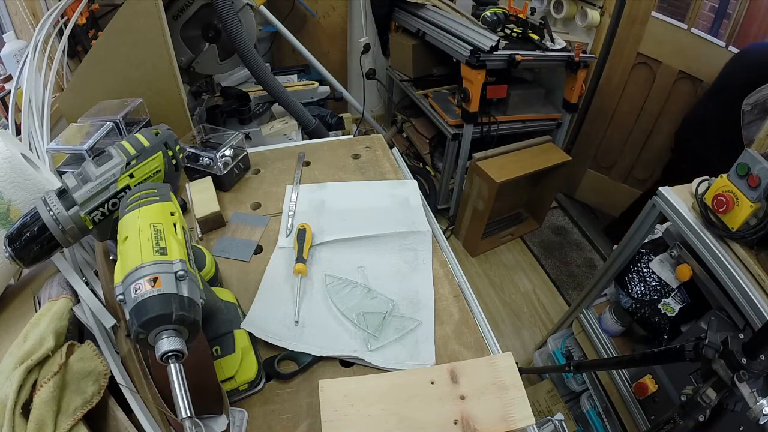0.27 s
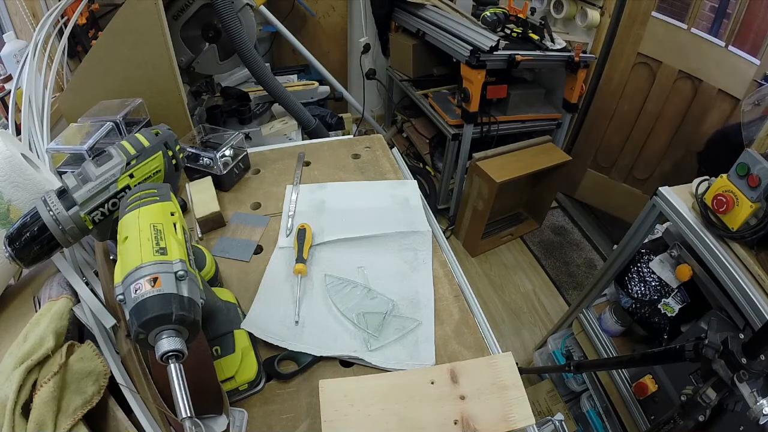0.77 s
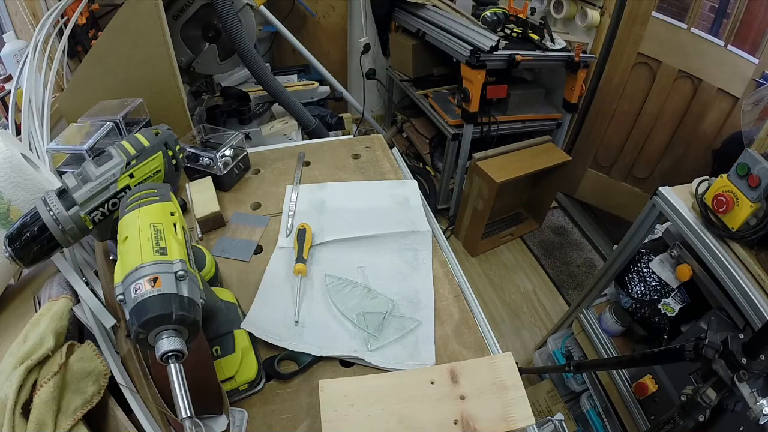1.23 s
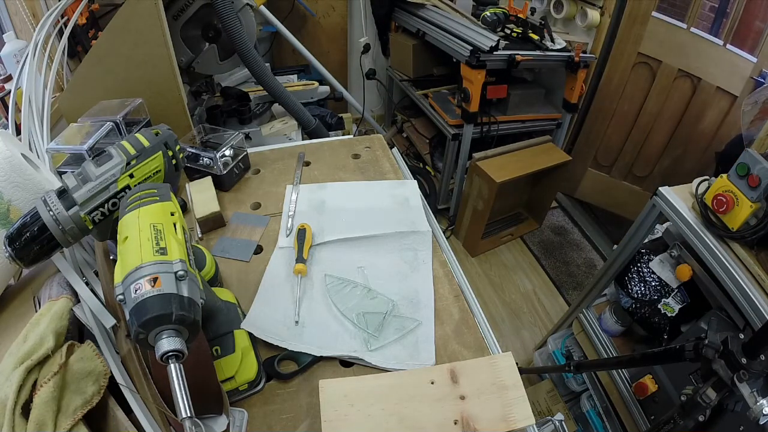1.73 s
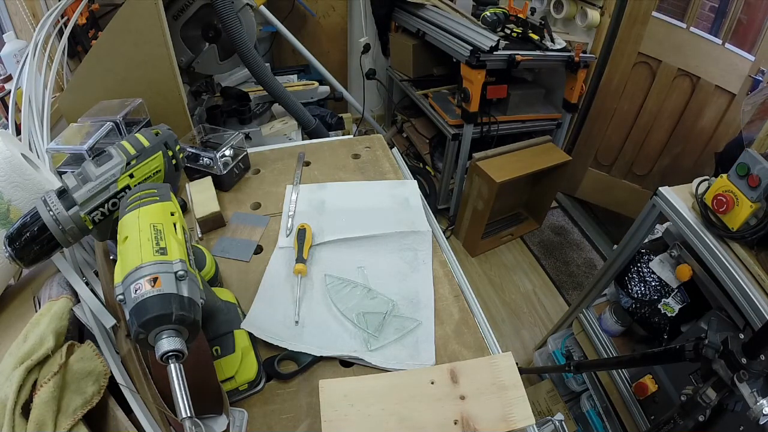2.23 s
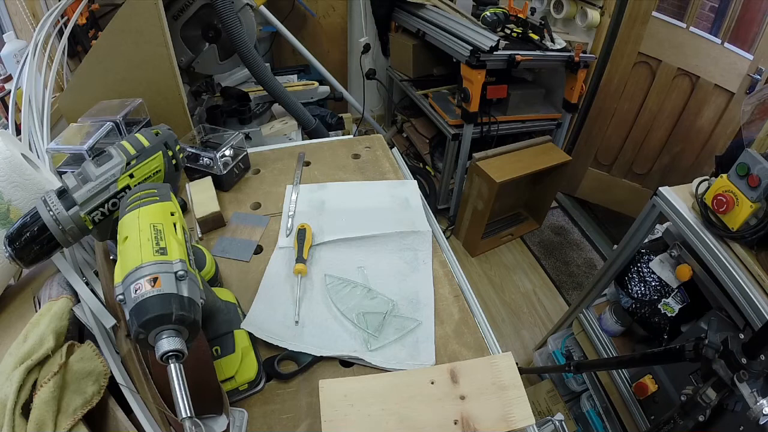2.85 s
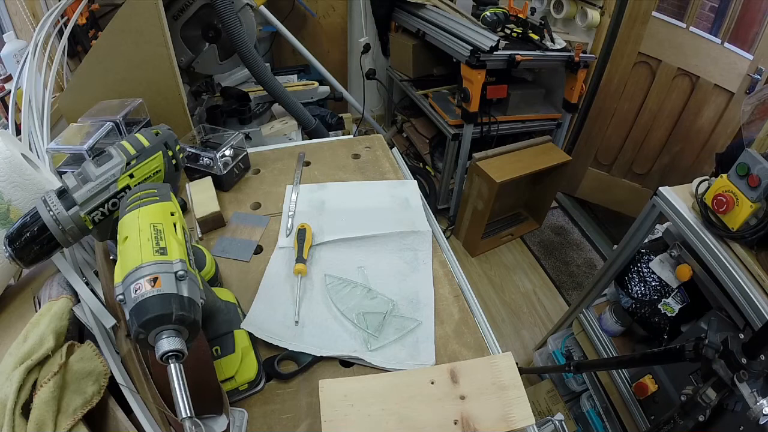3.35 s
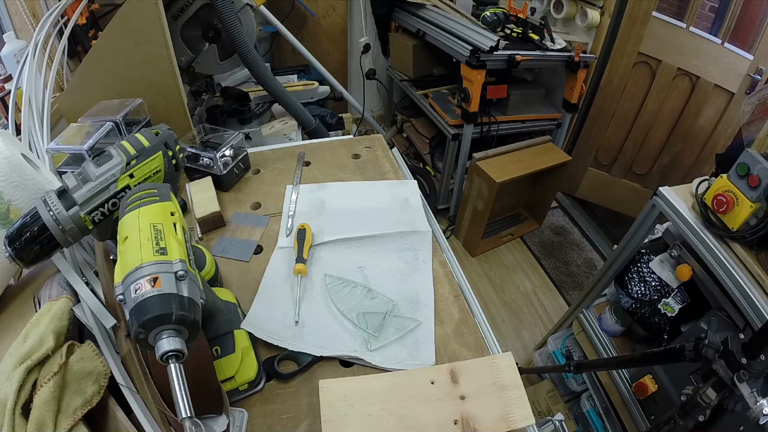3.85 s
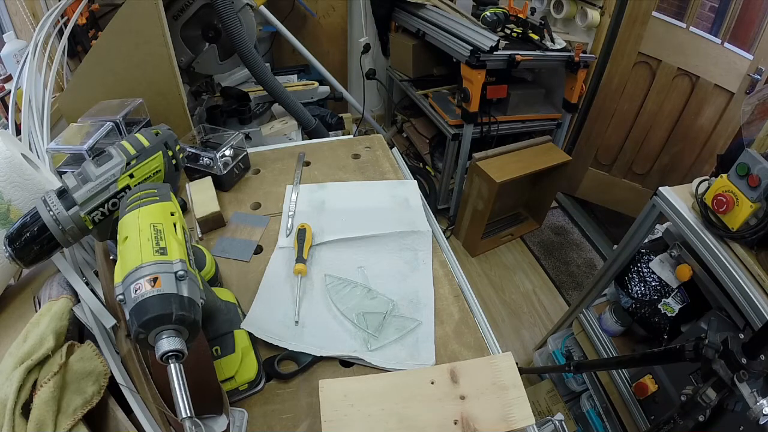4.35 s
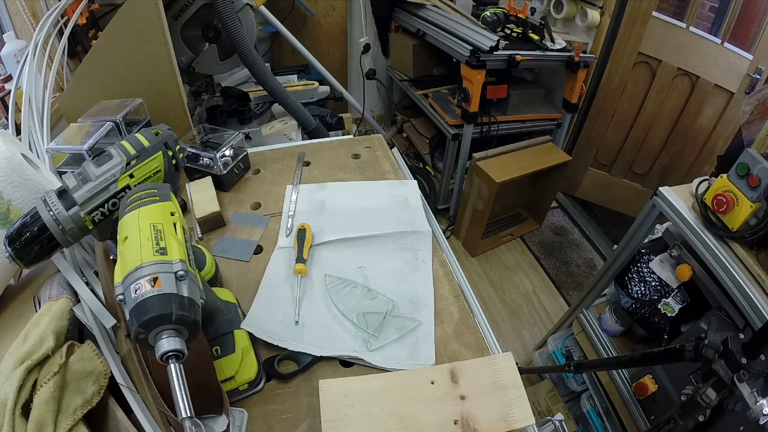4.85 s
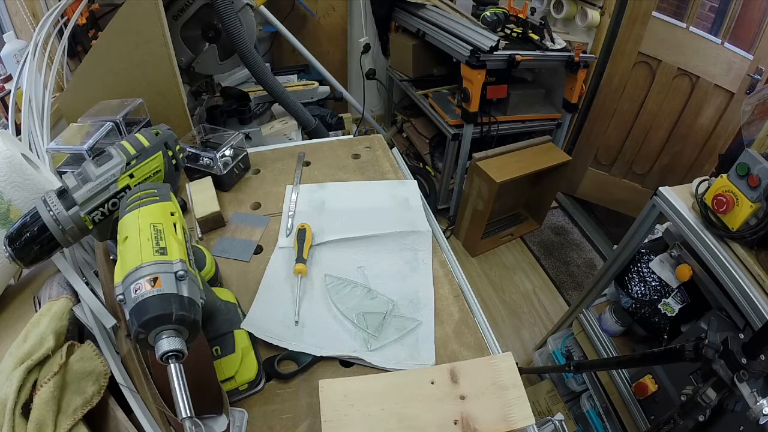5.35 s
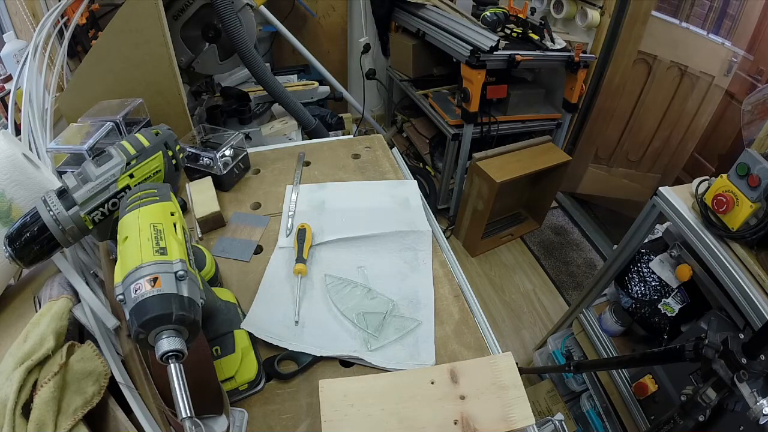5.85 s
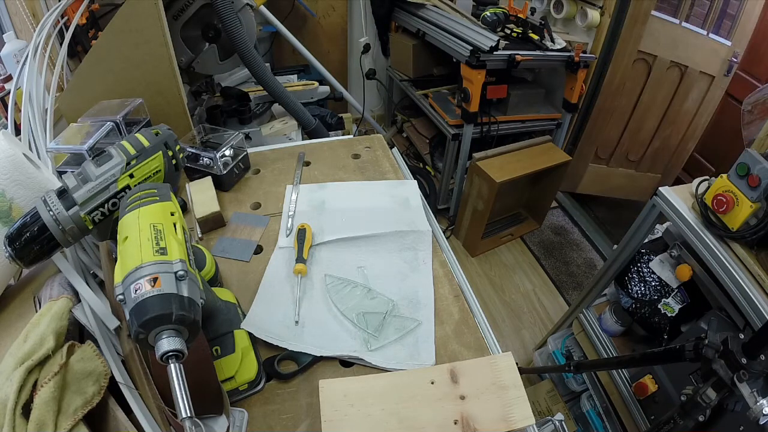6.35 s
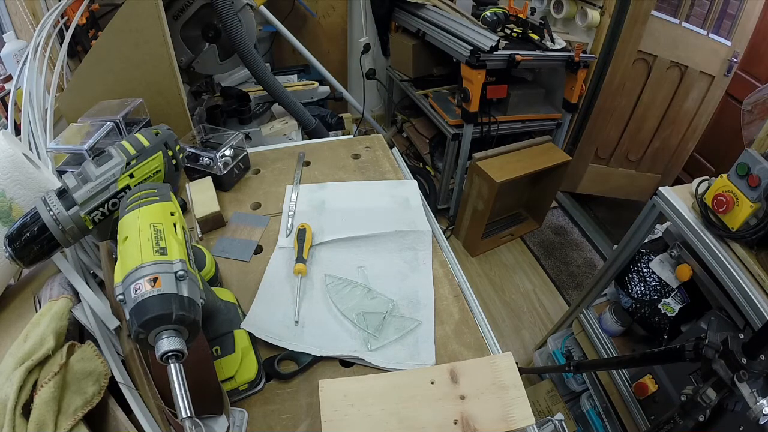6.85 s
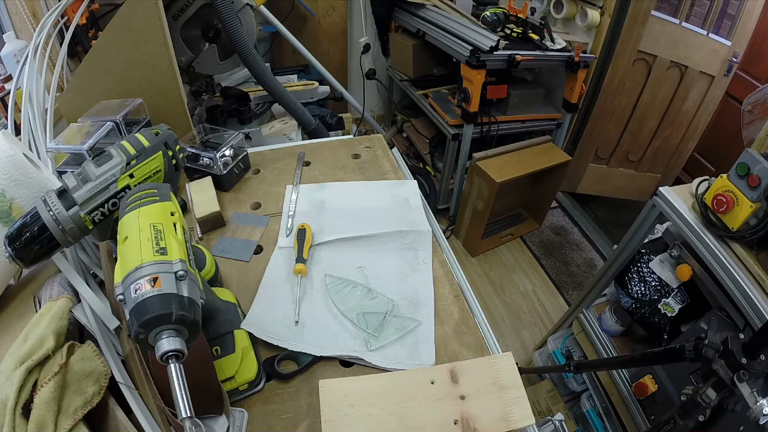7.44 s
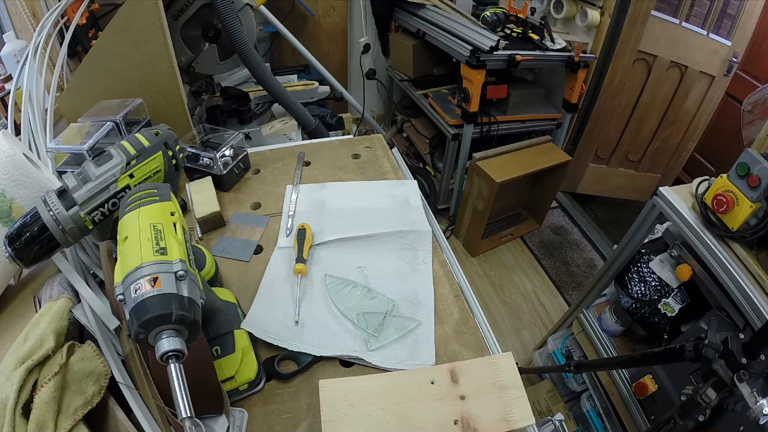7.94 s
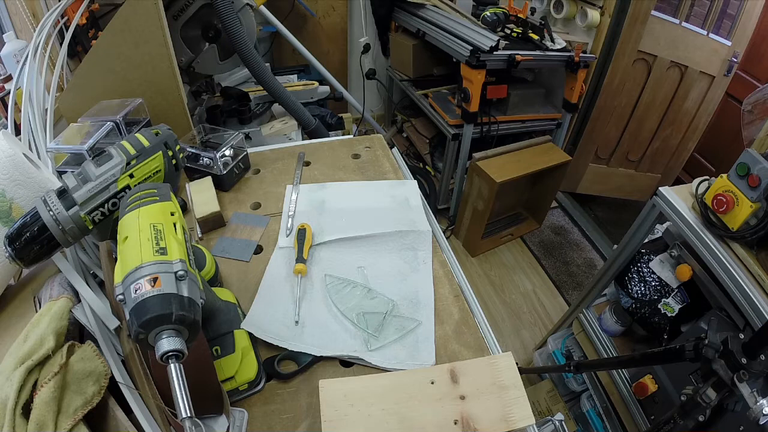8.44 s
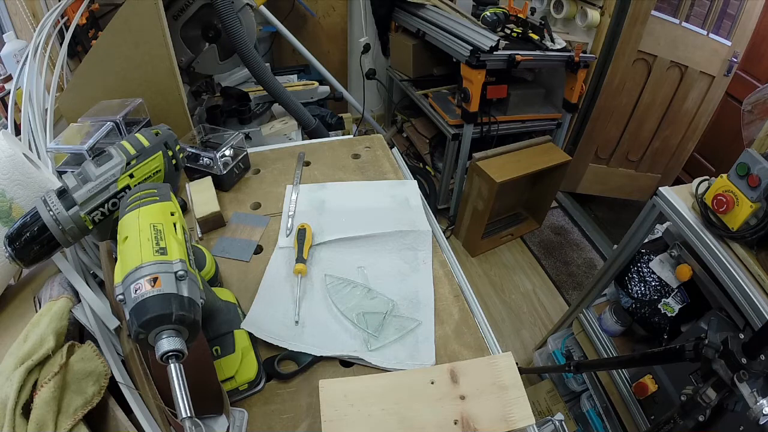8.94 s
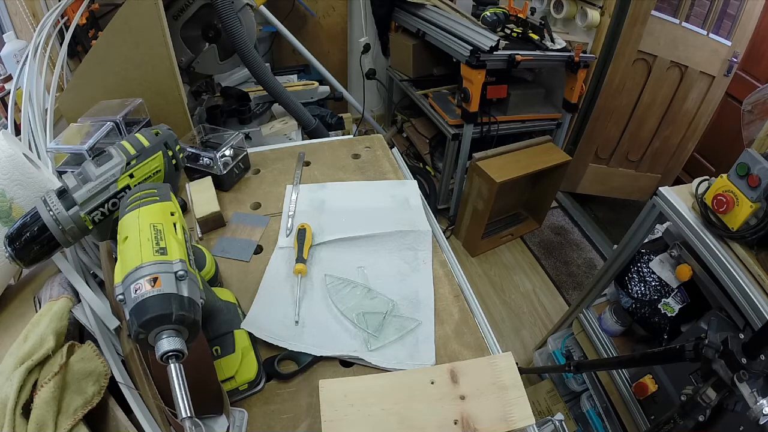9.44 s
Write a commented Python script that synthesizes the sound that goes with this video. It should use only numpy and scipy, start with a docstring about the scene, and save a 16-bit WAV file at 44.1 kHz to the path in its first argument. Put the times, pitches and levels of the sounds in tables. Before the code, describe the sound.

Small cluttered workshop, one close microphone with steady low rumble and faint hiss. Two light knocks on a framed glass pane, then eight hard blows, each a bright glassy crash with a hollow metal-frame boom, clipping from overload. The last cuts off abruptly; crumbs patter down, a few soft knocks follow, then irregular cracks, crunches and snaps of glass.

```python
"""Two trial knocks, then eight hard blows that crash, boom and clip; later crumbs trickle and glass ticks and snaps.
Laminated glass is beaten out of an old metal-framed windscreen in a small, cluttered workshop.
The pane is dense noise plus decaying modes, the frame a few low modes, the thump shaped low noise.
Cracks and shards are noise bursts that ring the pane's modes; crumbs are random grains and short tones.
Shaped noise gives the room's steady rumble and hiss."""
import sys
import numpy as np
from scipy import signal
from scipy.fft import rfft, irfft
from scipy.io import wavfile

SR = 44100
rng = np.random.default_rng(int(sys.argv[2]) if len(sys.argv) > 2 else 0)


def bounce(signal):
    """Save signal as a 16-bit WAV file at the path given by the first command-line argument."""
    frames = np.transpose(np.atleast_2d(signal))
    limited = np.clip(frames, -1, 1)
    pcm = np.round(limited * 32767).astype(np.int16)
    wavfile.write(sys.argv[1], SR, pcm)


N = 426888
TIME = np.arange(N) / SR  # seconds through the scene
TAIL = np.arange(int(.6 * SR)) / SR  # seconds after one impact
DIP_S = 5.714  # the boom stops short and the sound dips briefly


# Hard blows. Each row: start in seconds, pane level in dB, frame level in dB, main frame mode in Hz,
# thump level in dB, accent centre in Hz, accent in dB.
HARD_BLOWS = [(2.0459, -0.5, 0, 362.6, -11, 1690, 8), (3.054, -2, -5, 342.4, -19, 2280, 5.5),
              (3.480, -1, -5, 338.4, -9.5, 4550, 4), (3.8854, 1, -8.5, 352.5, -8.5, 980, 1.5),
              (4.4042, -2.5, -0.5, 349, -9, 2210, 5), (4.8226, -2, -3.5, 335, -7.5, 4200, 6.5),
              (5.2275, -2.5, 1.5, 339, -4, 1060, 2), (5.6092, -4, -4.5, 293, -1, 690, 9)]
BLOW_RISE_S, BLOW_DAMPING, BLOW_TILT_DB = .0003, 1.145, 0.81  # tilt in dB per octave


def blows():
    """Impact excitation: a hard, brief contact is bright and leaves the frame free to ring."""
    return sum(strike(*row, BLOW_RISE_S, BLOW_DAMPING, BLOW_TILT_DB) for row in HARD_BLOWS)


# Light knocks while the frame is gripped. Each row: start in seconds, pane level in dB, frame level in dB,
# main frame mode in Hz, accent centre in Hz, accent in dB.
LIGHT_KNOCKS = [(1.064, -22.5, -11, 336, 2570, 6.5), (1.111, -33.5, -20, 311, 2370, 6),
                (1.342, -36, -14.5, 334, 500, -17), (1.355, -11, -16.5, 474, 1560, 10),
                (4.136, -27, -21, 358, 900, 5), (4.187, -34, -31, 360, 2530, 1),
                (6.33, -26, -23.5, 477, 430, 11.5), (6.394, -47, -34, 414, 450, 4),
                (6.489, -22, -23.5, 365, 450, 9)]
KNOCK_RISE_S, KNOCK_DAMPING, KNOCK_TILT_DB = 0.0055, 2.02, -1.5
KNOCK_THUMP_DB = 0.5  # relative to the frame


def knocks():
    """Contact damping: a softer touch darkens the sound and the grip shortens the frame's ringing."""
    out = np.zeros(N)
    for s, pane_db, frame_db, frame_hz, accent_hz, accent_db in LIGHT_KNOCKS:
        thump_db = frame_db + KNOCK_THUMP_DB
        out += strike(s, pane_db, frame_db, frame_hz, thump_db, accent_hz, accent_db,
                      KNOCK_RISE_S, KNOCK_DAMPING, KNOCK_TILT_DB)
    return out


# The frame rocks back onto its support after a hit. Each row: start in seconds, pane level in dB.
FRAME_REBOUNDS = [(1.541, -41.5), (3.663, -32), (4.520, -26), (4.946, -32), (5.050, -42.5), (5.390, -28.5)]
REBOUND_RISE_S, REBOUND_DAMPING, REBOUND_TILT_DB = 0.021, 0.83, -2
REBOUND_FRAME_DB, REBOUND_FRAME_HZ, REBOUND_THUMP_DB = -3, 342, -5.5  # levels relative to the pane
REBOUND_ACCENT_HZ, REBOUND_ACCENT_DB = 730, 5


def rebounds():
    """Slow contact: the frame settles with a dull bump, always on the same spot."""
    out = np.zeros(N)
    for s, db in FRAME_REBOUNDS:
        out += strike(s, db, db + REBOUND_FRAME_DB, REBOUND_FRAME_HZ, db + REBOUND_THUMP_DB,
                      REBOUND_ACCENT_HZ, REBOUND_ACCENT_DB,
                      REBOUND_RISE_S, REBOUND_DAMPING, REBOUND_TILT_DB)
    return out


# Thump of the support and floor. Each row: frequency in Hz, relative spectral level in dB per Hz.
THUMP_SPECTRUM = [(25, -29.5), (50, -29), (75, 0.5), (110, -4), (190, 3), (290, -3.5), (420, -8.5),
                  (800, -61)]
TOUCH_DB, TOUCH_LEAD_S = -17.5, .0027  # the tool grazes first; level relative to the pane
FRAME_LAG_S = 0.005005  # the frame answers late


def strike(s, pane_db, frame_db, frame_hz, thump_db, accent_hz, accent_db, rise, damping, tilt_db):
    """Superposition of one hit: a light touch, the pane's crash, the thump below and the frame's late boom."""
    out = np.zeros(N)
    glass = from_db(pane_db) * pane(rise, tilt_db, accent_hz, accent_db)
    boom = from_db(frame_db) * frame(frame_hz, damping)
    thump = from_db(thump_db) * dense_ring(at_hz(THUMP_SPECTRUM, bins(len(TAIL))), damping)
    touch = from_db(pane_db + TOUCH_DB) * pane(0.00045, -1.8, accent_hz, 0) * np.exp(-TAIL / 0.0053)
    # hits still ringing near DIP_S fade out in 29 ms
    alive = np.clip((DIP_S - s - TAIL) / 0.029, 0, 1) if s < DIP_S else 1
    add(out, s - TOUCH_LEAD_S, touch)
    add(out, s, (glass + thump) * alive)
    add(out, s + FRAME_LAG_S, boom * alive)
    return out


# The pane's dense crash. Each row: frequency in Hz, relative spectral level in dB per Hz.
CRASH_SPECTRUM = [(100, -24.5), (250, 9.5), (450, 6.5), (580, 4), (720, 3), (1200, 4.5), (2400, 0),
                  (3500, -1.5), (5000, -6), (6500, -9.5), (8500, -16.5), (12000, -22.5), (16000, -32)]
# The pane's clearest modes. Each row: frequency in Hz, level in dB, t60 in seconds.
PANE_MODES = [(653.4, -18.5, 0.18), (721, -11, 0.21), (748.7, -12, 0.15), (971, -12, 0.17),
              (995, -11, 0.16), (1100, -17, 0.13), (1161, -13.5, 0.21), (1419, -21, 0.14),
              (1566, -33, 0.12), (1757, -21, 0.27), (1979, -13.5, 0.19), (1935, -13, 0.2),
              (2106, -13, 0.07), (2245, -6.5, 0.062), (2390, -15, 0.14), (2598, -13, 0.11),
              (2790, -22, 0.22), (2834, -20.5, 0.21), (3156, -17, 0.13), (3764, -19.5, 0.081),
              (4440, -35.5, 0.075), (4650, -25.5, 0.14), (6000, -29, 0.15)]


def pane(rise, tilt_db, accent_hz, accent_db, accent_octaves=0.19, crack_db=3, crack_s=0.013, crash_db=-2.0):
    """Modal excitation of a plate: the struck spot favours one range of the glass's modes."""
    def contact_db(hz):
        # the tilt pivots at 1.5 kHz, is level below 400 Hz and doubles above 6 kHz
        octaves = np.log2(np.maximum(hz, 400) / 1500) + np.log2(np.maximum(hz / 6000, 1))
        accent = accent_db * (hump(hz, accent_hz, accent_octaves) - .5)
        return tilt_db * octaves + accent

    hz = bins(len(TAIL))
    crash = from_db(crash_db) * dense_ring(at_hz(CRASH_SPECTRUM, hz) + contact_db(hz), rise=rise)
    modes = [(f, db + contact_db(f), t60) for f, db, t60 in PANE_MODES]
    ring = modal_ring(modes, rise=max(rise, .002), scatter_db=3)
    # the fracture itself makes the first milliseconds louder
    fracture = 1 + from_db(crack_db) * np.exp(-TAIL / crack_s)
    return (crash + ring) * fracture * early_echoes()


def early_echoes(lift_db=2, at_s=0.039, width_s=0.0081):
    """Early reflection: a first cluster from bench and walls, imitated by a brief lift in level."""
    return from_db(lift_db * np.exp(-.5 * ((TAIL - at_s) / width_s) ** 2))


# The frame's lesser modes. Each row: frequency in Hz, level in dB, t60 in seconds before division by the damping.
FRAME_MODES = [(190.8, -10, 0.26), (247.5, -22, 0.43), (309.5, -7, 0.21), (377.3, -4, 0.18),
               (481.4, -3, 0.16)]


def frame(main_hz, damping, boom_db=10, boom_t60=0.13):
    """Modal resonance: one main mode, its pitch set by the hold, booms and rattles as the frame rocks."""
    all_modes = [(main_hz, boom_db, boom_t60)] + FRAME_MODES
    damped = [(hz, db, t60 / damping) for hz, db, t60 in all_modes]
    ring = modal_ring(damped, rise=0.0074, scatter_db=1.5)
    return ring * stutter(depth_db=2.2, step_s=.007)


def modal_ring(modes, rise, scatter_db):
    """Modal synthesis: decaying sines, excited by each impact with strengths of its own."""
    out = 0
    for hz, db, t60 in modes:
        strength, phase = rng.standard_normal(2)
        tone = np.sin(2 * np.pi * (hz * TAIL + phase))
        out = out + from_db(db + scatter_db * strength) * tone * swell(rise, t60)
    return out


# Build-up and decay in the workshop. Each row: frequency in Hz, shortest rise time constant in seconds,
# t60 in seconds before division by the damping.
ROOM_DECAY = [(74.6, 0.032, 0.49), (180, 0.021, 0.33), (398, 0.0057, 0.26), (1000, 0.0053, 0.23),
              (3000, 0.0021, 0.22), (6500, 0.0021, 0.21), (14000, 0.0011, 0.17)]


def dense_ring(colour_db, damping=1, rise=0, ripple_db=3.0):
    """High modal overlap: countless modes and reflections act as noise whose lows start later and last longer."""
    hz = bins(len(TAIL))
    noise = coloured(rng.standard_normal(len(TAIL)), colour_db + ripple_db * ripple(hz))
    spectrum = rfft(noise)
    knots = np.log([row[0] for row in ROOM_DECAY])
    out = 0
    # each row of the identity matrix picks one of the crossfaded bands
    for share, (_, build, t60) in zip(np.eye(len(ROOM_DECAY)), ROOM_DECAY):
        band = irfft(spectrum * np.interp(np.log(hz), knots, share), len(TAIL))
        out = out + band * swell(max(build, rise), t60 / damping)
    return out


def ripple(hz, width_hz=25):
    """Modal statistics: modes bunch by chance into narrow peaks and valleys; spread about 1."""
    knots = np.arange(0, SR, width_hz)
    return np.interp(hz, knots, rng.standard_normal(len(knots)))


def stutter(depth_db=0.5, step_s=0.001):
    """Random amplitude modulation: strength is uneven, as in a crack's tiny jumps or a rocking frame; rms 1."""
    jumps = rng.standard_normal(2000)
    return rms_one(from_db(depth_db * np.interp(TAIL / step_s, np.arange(len(jumps)), jumps)))


# Crazed glass cracks under pressure, quickly or in a slow crunch. Each row: start in seconds, level in dB,
# centre in Hz, spread in octaves, rise time constant in seconds.
PRESSURE_CRACKS = [(.312, -52.5, 5500, 0.63, .002), (.483, -45.5, 4600, .83, 0.0099),
                   (5.563, -44, 2600, 0.84, 0.0043), (6.193, -38, 1970, 1.2, 0.007),
                   (6.331, -39.5, 12000, 0.87, 0.0025), (6.473, -39, 3500, 0.83, .006),
                   (6.545, -34, 2580, 0.95, 0.0039), (6.579, -27.5, 1930, 1.08, 0.017),
                   (6.624, -37.5, 4500, 2.4, .011), (6.705, -41, 1180, .76, 0.0027),
                   (6.930, -27.5, 860, 0.58, .024), (6.945, -36.5, 2200, 1.16, .004),
                   (7.464, -40, 3580, 1, 0.0098), (7.785, -48, 4000, 1.4, .002),
                   (8.31, -28, 7000, 1.03, 0.0063), (8.461, -42, 4140, .82, 0.0041),
                   (8.681, -48, 3800, 0.75, .003), (8.895, -21, 1860, 1.09, 0.0018),
                   (9.027, -31, 5000, 1.35, 0.0041), (9.138, -27.5, 4000, 1.9, .013),
                   (9.244, -41, 3000, 0.98, 0.013), (9.375, -34.5, 5430, 1.25, 0.0055),
                   (9.597, -33, 4440, 1.46, .0027)]
CRACK_RING_DB = 2  # how strongly a crack rings the pane


def cracks():
    """Brittle fracture: small cracks release energy over a wide range of pitch."""
    out = np.zeros(N)
    for s, db, centre_hz, octaves, rise in PRESSURE_CRACKS:
        add(out, s, from_db(db) * glass_tick(centre_hz, octaves, rise, CRACK_RING_DB))
    return out


# Small shards drop and tink. Each row: start in seconds, level in dB, pitch in Hz.
FALLING_SHARDS = [(5.9215, -45, 6250), (6.125, -53, 6360), (7.458, -53, 13000), (8.619, -51, 11300),
                  (8.649, -51, 10700)]
SHARD_OCTAVES, SHARD_RISE_S, SHARD_RING_DB = 0.15, 0.0014, -6


def shards():
    """Small-body resonance: each falling shard rings in a narrow range of its own."""
    out = np.zeros(N)
    for s, db, hz in FALLING_SHARDS:
        add(out, s, from_db(db) * glass_tick(hz, SHARD_OCTAVES, SHARD_RISE_S, SHARD_RING_DB))
    return out


def glass_tick(centre_hz, octaves, rise, ring_db, skirt_db=-32, snap_db=-4, snap_s=0.0077):
    """Transient excitation: a snap in one range of pitch sets the pane's modes there ringing."""
    def colour_db(f):
        return 20 * np.log10(hump(f, centre_hz, octaves) + from_db(skirt_db))

    snap = dense_ring(colour_db(bins(len(TAIL))), damping=0.98, rise=rise) * stutter()
    modes = [(f, level + ring_db + colour_db(f), t60) for f, level, t60 in PANE_MODES]
    ring = modal_ring(modes, rise, scatter_db=3)
    return (snap + ring) * (1 + from_db(snap_db) * np.exp(-TAIL / snap_s))


FAINT_TINKS_DB = -50  # from DIP_S on, faint short tinks at random times, at a constant level


def crumbs(per_s=3000, size_db=2, chips_per_s=35, chip_db=-5, chip_ring_s=.05):
    """Random impact process: fine grit lands in a dense, hissing patter; larger chips give short tinks."""
    sizes = from_db(size_db * np.minimum(rng.exponential(1, N), 4)) * rng.choice([-1, 1], N)
    grains = sizes * (rng.random(N) < per_s / SR)
    # (Hz, relative dB)
    colour = [(40, -35), (300, -9), (1200, -0.5), (4000, 4.0), (8000, -2.0), (15000, -7.0)]
    grit = coloured(grains, at_hz(colour, bins(N)))
    chips = np.zeros(N)
    gap, pitch, size = rng.random((300, 3)).T  # at most 300 chips
    starts = np.cumsum(-np.log(1 - gap) / chips_per_s)
    fade = from_db(chip_db) * swell(0, chip_ring_s)
    for s, hz, strength in zip(starts[starts < TIME[-1]], 1500 * 5 ** pitch, 2 * size):
        add(chips, s, strength * np.sin(2 * np.pi * hz * TAIL) * fade)
    faint_tinks = from_db(FAINT_TINKS_DB) * chips * (TIME > DIP_S)
    return spill_flow() * (grit + chips) + faint_tinks


# Spills of crumbs. Each row: start in seconds, level in dB, length in seconds.
SPILLS = [(.39, -56, .06), (5.704, -39.5, .11), (6.054, -49.5, 0.053), (6.21, -56, .04), (6.56, -56, 0.12),
          (6.853, -51.5, 0.044)]
SPILL_ATTACK_S, SPILL_T60_S = 0.017, 0.48


def spill_flow():
    """Flow envelope: each spill starts quickly, runs for its length, then decays exponentially."""
    out = np.zeros(N)
    for s, db, length in SPILLS:
        attack = np.clip((TIME - s) / SPILL_ATTACK_S, 0, 1)
        after_s = np.maximum(TIME - s - length, 0)
        out += attack * from_db(db - 60 * after_s / SPILL_T60_S)
    return out


# Room background. Each row: frequency in Hz, relative spectral level in dB per Hz.
AIR_SPECTRUM = [(20, 0.0), (42, -2.5), (72, -0.5), (125, -9.6), (230, -8.0), (450, -13.4), (950, -13.8),
                (1500, -19.1), (2100, -21.6), (3400, -28.1), (6000, -34.6), (9000, -41.0), (13000, -47.3),
                (15500, -51.6)]
AIR_DB = -41  # rms level of the room background


def background():
    """Stationary noise: the steady rumble and hiss of the workshop."""
    return from_db(AIR_DB) * coloured(rng.standard_normal(N), at_hz(AIR_SPECTRUM, bins(N)))


def swell(rise, t60):
    """Exponential build-up and decay of a resonance; rise is a time constant."""
    return (1 - np.exp(-TAIL / max(rise, 1e-4))) * from_db(-60 * TAIL / t60)


def coloured(x, colour_db):
    """Spectral filtering: weight a noise's spectrum, then scale to rms 1."""
    return rms_one(irfft(rfft(x) * from_db(colour_db), len(x)))


def hump(hz, centre_hz, octaves):
    """Gaussian band weighting: a bell of height 1 on a log-frequency axis."""
    return np.exp(-.5 * (np.log2(hz / centre_hz) / octaves) ** 2)


def at_hz(points, hz):
    """Log-frequency interpolation of a table of (Hz, value)."""
    knots, values = np.transpose(points)
    return np.interp(np.log(hz), np.log(knots), values)


def bins(size):
    """Discrete spectrum: bin frequencies in Hz for this many samples, at least 1 Hz."""
    return np.maximum(np.arange(size // 2 + 1) * SR / size, 1)


def from_db(db):
    """Level law: decibels to amplitude gain."""
    return 10 ** (np.asarray(db) / 20)


def rms_one(x):
    """Normalisation of mean power: scale to rms 1."""
    return x / np.sqrt(np.mean(x ** 2) + 1e-20)


def add(out, s, sound):
    """Superposition: mix a sound in at a time in seconds."""
    start = max(int(s * SR), 0)
    out[start:start + len(sound)] += sound[:len(out) - start]


def scene(dip_db=-14, dip_width_s=0.0024):
    """Superposition of all sources at one microphone; the level dips briefly at DIP_S."""
    dip = from_db(dip_db * np.exp(-.5 * ((TIME - DIP_S) / dip_width_s) ** 2))
    hits = blows() + knocks() + rebounds()
    debris = cracks() + shards() + crumbs()
    return ((hits + debris + background()) * dip)[None]


CUTOFF_HZ = 15500


def record(dry):
    """Overload and band limiting: peaks clip flat just below full scale, then the top is cut."""
    clipped = np.clip(dry, -.98, .98)
    low_pass = signal.butter(16, CUTOFF_HZ, fs=SR, output="sos")
    return signal.sosfiltfilt(low_pass, clipped)


dry = scene()
out = record(dry)
bounce(out)
```